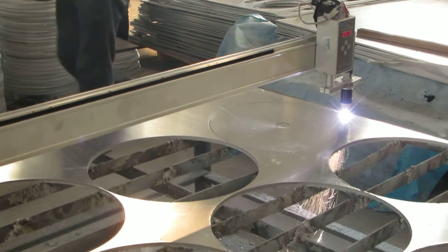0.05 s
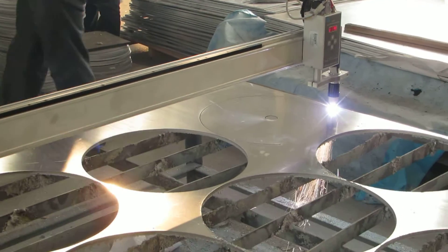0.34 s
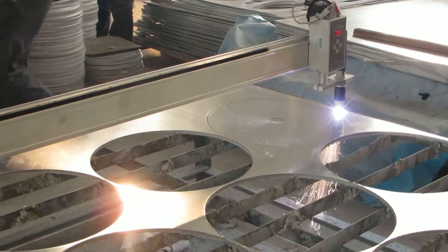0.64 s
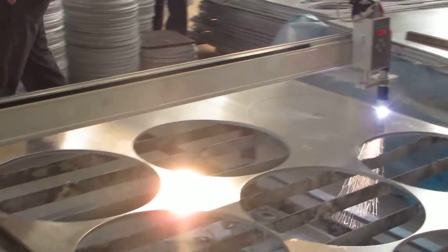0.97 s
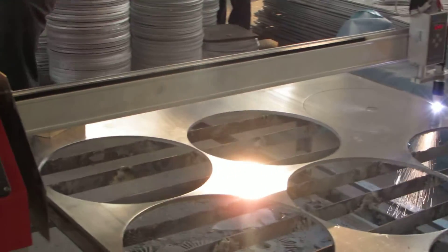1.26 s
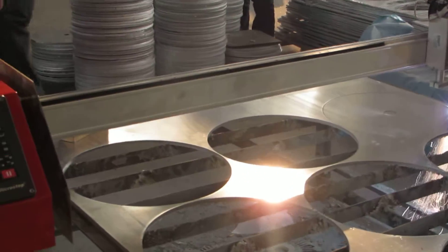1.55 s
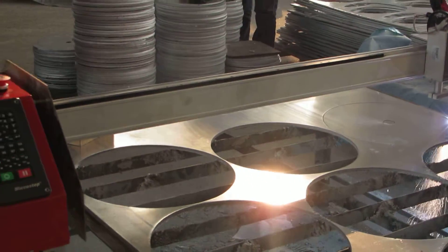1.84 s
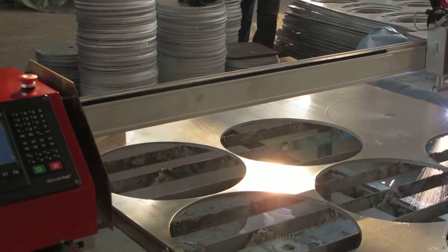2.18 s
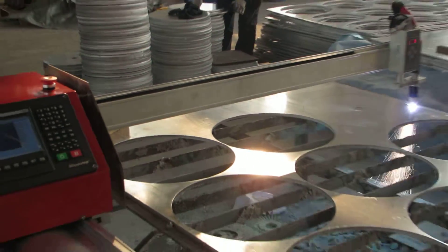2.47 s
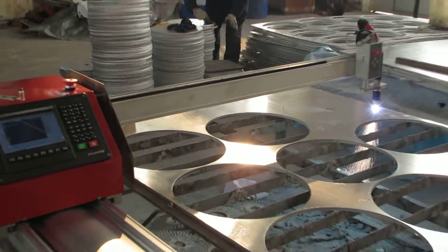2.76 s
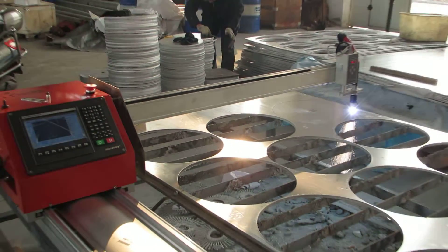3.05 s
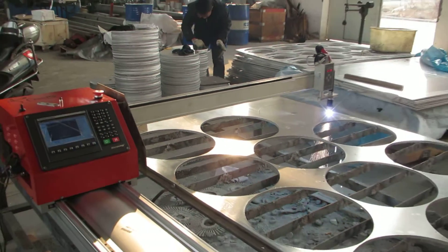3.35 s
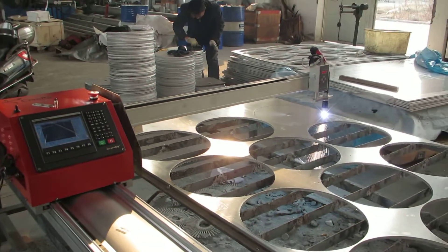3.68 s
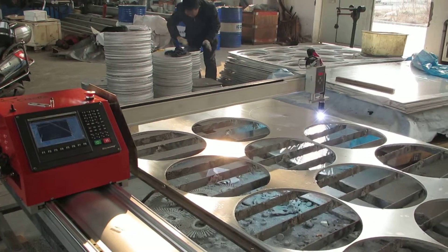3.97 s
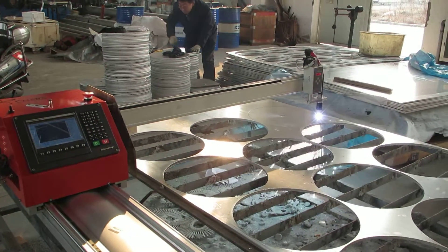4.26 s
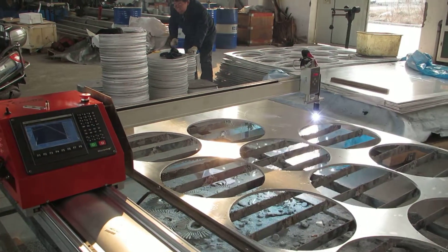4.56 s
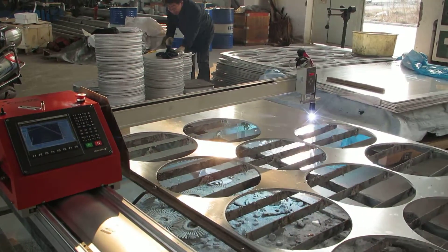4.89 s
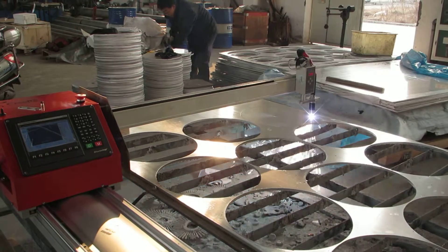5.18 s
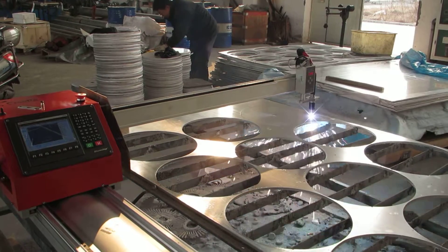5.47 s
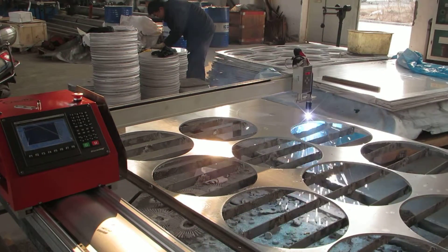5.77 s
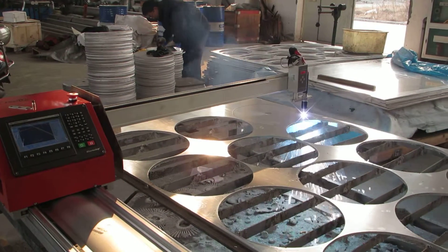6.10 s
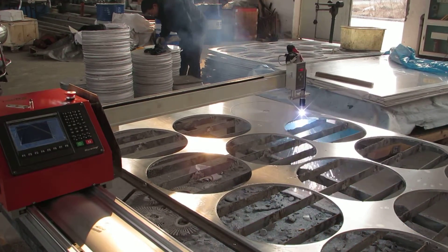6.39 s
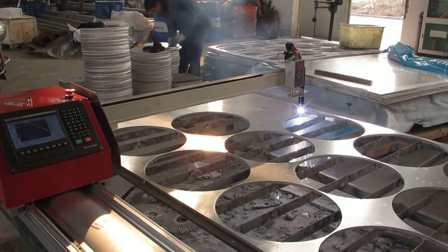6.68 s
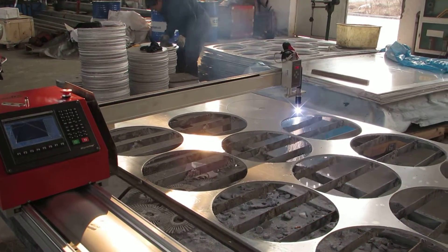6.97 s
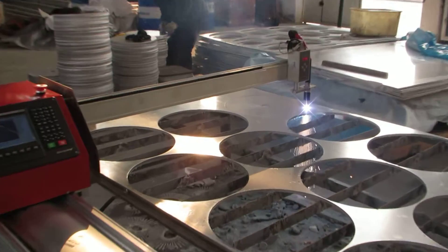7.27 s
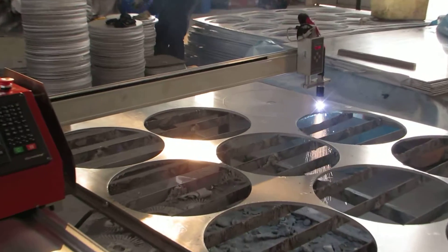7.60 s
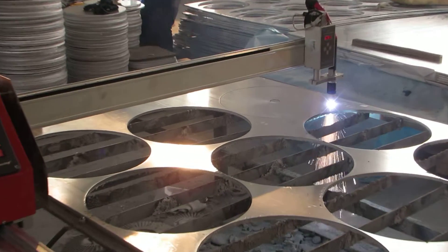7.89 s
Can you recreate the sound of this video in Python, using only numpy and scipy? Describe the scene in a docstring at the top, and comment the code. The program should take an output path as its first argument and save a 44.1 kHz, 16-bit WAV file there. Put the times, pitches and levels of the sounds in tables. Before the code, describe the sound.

A plasma torch cuts a metal plate in a workshop with a loud, continuous hiss. Fine sparks crackle within it, faint whistling tones shift in pitch, and a hollow roar comes from under the plate. Around the middle the roar swells, then the jet sputters brightly as it crosses a table slat and settles back into an even hiss. The sound is fairly close, with short reflections.

```python
"""Workshop: a plasma torch cuts discs out of a metal plate on a slatted table.
The turbulent jet roars in the hollow under the plate, hisses on top and sings faintly in the cut.
The roar swells, then the jet meets a slat and sputters brightly.
Molten droplets burst as crackling sparks throughout."""
import sys
import numpy as np
from scipy import signal
from scipy.io import wavfile

SR = 44100
rng = np.random.default_rng(int(sys.argv[2]) if len(sys.argv) > 2 else 0)


def put_to_file(sound):
    """Save the sound as 16-bit audio at rate SR, in the file named by the first command-line argument."""
    columns = np.atleast_2d(sound).T  # one column per channel
    safe = np.clip(columns, -1, 1)
    whole_steps = np.round(safe * 32767)
    wavfile.write(sys.argv[1], SR, whole_steps.astype(np.int16))


N = 350154
TIME_S = np.arange(N) / SR
SLAT_FROM_S, SLAT_TO_S = 5.55, 5.8   # jet crosses the slat


def from_db(db):
    """Decibels to gain."""
    return 10 ** (np.asarray(db) / 20)


def unit_rms(x):
    """Scale to rms 1."""
    return x / np.sqrt(np.mean(x ** 2) + 1e-20)


def in_time(curve):
    """Curve value at every sample."""
    return np.interp(TIME_S, *np.transpose(curve))


def at_hz(curve, hz):
    """Curve value on a log-frequency axis."""
    knots_hz, values = np.transpose(curve)
    return np.interp(np.log(hz), np.log(knots_hz), values)


def arch(start_s, end_s):
    """Rise from 0 to 1 and back between two times."""
    progress = np.clip((TIME_S - start_s) / (end_s - start_s), 0, 1)
    return np.sqrt(np.sin(np.pi * progress))


def surges(rows):
    """One curve of summed arches per gain column."""
    return sum(np.outer(gains_db, arch(start_s, end_s)) for start_s, end_s, *gains_db in rows)


def drift(rate_hz):
    """Slow random motion; rms 1."""
    step, settle = 40, 4000
    pole = np.exp(-2 * np.pi * rate_hz * step / SR)
    white = rng.standard_normal(N // step + settle + 2)
    slow = signal.lfilter([1], [1, -2 * pole, pole * pole], white)[settle:]
    return np.interp(np.arange(N) / step, np.arange(len(slow)), unit_rms(slow))


def resonate(x, hz, width_hz):
    """Two-pole resonance; peak gain 1."""
    r = np.exp(-np.pi * width_hz / SR)
    feedback = [1, -2 * r * np.cos(2 * np.pi * hz / SR), r * r]
    return signal.lfilter(np.array([1, 0, -1]) * (1 - r * r) / 2, feedback, x)


def spread(pair, hz):
    """Two independent noises to left and right, less alike in the treble."""
    # stereo likeness: (frequency [Hz], left-right correlation [1])
    likeness = [(30, 0.8), (130, 0.92), (700, 0.97), (1400, 0.97), (2800, 0.92), (5500, 0.89), (9000, 0.75),
                (13000, 0.47)]
    # stereo balance: (frequency [Hz], left minus right [dB])
    balance = [(30, -5), (80, -2.5), (180, -1.3), (600, -2), (1400, -0.5), (2800, -2), (5500, -0.7),
               (9500, 0.3), (13000, 1)]
    alike, sides = at_hz(likeness, hz), np.array([[1], [-1]])
    stereo = np.sqrt(1 + alike) * pair[0] + np.sqrt(1 - alike) * pair[1] * sides
    return stereo * from_db(sides * at_hz(balance, hz) / 2)


def turbulence(spectrum, flicker_db, flicker_hz):
    """Eddies: stereo noise bands, each flickering on its own; rms 1."""
    out, white = 0, rng.standard_normal((2, 2, N + SR // 4))
    edges_hz = np.concatenate([np.geomspace(20, 2560, 17)[:-1], np.geomspace(2560, 17000, 14)])
    for k, (low_hz, high_hz) in enumerate(zip(edges_hz, edges_hz[1:])):
        if high_hz > spectrum[0][0] and low_hz < spectrum[-1][0]:
            hz = np.sqrt(low_hz * high_hz)
            bandpass = signal.butter(3, [low_hz, high_hz], "band", fs=SR, output="sos")
            band = signal.sosfilt(bandpass, white[k % 2])[:, -N:]
            level_db = at_hz(spectrum, hz) + flicker_db * drift(flicker_hz)
            out = out + spread(band, hz) * from_db(level_db)
    return unit_rms(out)


def ring(flow, modes, waver_db=1.3):
    """A flow plus the resonances it rings, each unsteady; rms 1."""
    ringing = sum(from_db(db + waver_db * drift(2.5)) * resonate(flow, hz, width_hz)
                  for hz, width_hz, db in modes)
    return unit_rms(flow + ringing)


def reflections(x, gain, nearest_s, farthest_s, sway_s, count):
    """Echoes off plate, gantry and stacks; shifting paths make the colour wander."""
    out = x.copy()
    delays_s = np.geomspace(nearest_s, farthest_s, count) * rng.uniform(.9, 1.1, count)
    for k, delay_s in enumerate(delays_s):
        sent_s = TIME_S - delay_s - sway_s * drift(.16)
        echo = np.array([np.interp(sent_s, TIME_S, side, left=0) for side in x])
        out += (-1) ** k * gain * echo
    return out / np.sqrt(1 + count * gain ** 2)


def slat_notches(x):
    """Echoes off the slats cancel parts of the noise as the torch moves."""
    # cancelled bands: (start [s], end [s], centre [Hz], width [Hz], peak share cancelled [1])
    notches = [(-.5, 2, 2100, 700, .25), (.4, 1.5, 6120, 250, 0.35), (.4, 1.5, 6800, 200, 0.32),
               (2.4, 3.4, 3800, 250, .25), (3, 4.1, 1860, 200, .3), (4.1, 5, 5420, 180, .3),
               (5.3, 6.4, 4060, 150, .33), (5.3, 6.45, 4980, 290, .64), (5.5, 6.4, 3000, 250, 0.38),
               (5.3, 7.3, 6350, 200, .33), (5.3, 6.7, 7630, 200, .35), (6.4, 8.6, 4846, 600, .2)]
    return x - sum(share * arch(start_s, end_s) * resonate(x, hz, width_hz)
                   for start_s, end_s, hz, width_hz, share in notches)


def table_modes():
    """Past the slat, the jet enters another bay and rings the table in new proportions."""
    # plate, slat and frame modes: (centre [Hz], width [Hz], gain before slat [dB], gain after [dB])
    modes = [(745, 55, 0.5, 0.5), (875, 75, 2, 5), (1085, 38, -5, -10), (1350, 70, -2, -2.5),
             (1500, 36, -10, 0), (1556, 48, -4, -11), (1773, 31, -12, 0.5), (2155, 130, -4.5, -6),
             (2450, 35, 0.5, -4), (2783, 50, 0, -2)]
    crossed = np.clip((TIME_S - SLAT_FROM_S) / (SLAT_TO_S - SLAT_FROM_S), 0, 1)
    return [(hz, width_hz, before_db + crossed * (after_db - before_db))
            for hz, width_hz, before_db, after_db in modes]


def sparks(per_s, size_range_db, hz, width_hz):
    """Molten droplets burst as tiny ticks of uneven size; rms 1."""
    sizes = from_db(size_range_db * rng.random(N)) * rng.choice([-1, 1], N)
    ticks = sizes * (rng.random(N) < per_s / SR)
    decay_s = .0004
    bursts = signal.lfilter([1], [1, -np.exp(-1 / (decay_s * SR))], ticks + 1e-18)
    noise = spread(rng.standard_normal((2, N)), hz)
    return unit_rms(resonate(bursts * noise, hz, width_hz))


def faint_bands(per_s=4, length_s=.7, low_hz=6000, high_hz=10300, width_hz=195, level_db=-16.5):
    """Weak bands at random times and pitches, as rows for singing()."""
    chance = rng.random((64, 2))
    starts_s = (np.arange(len(chance)) + chance[:, 0]) / per_s - length_s
    pitches_hz = low_hz * (high_hz / low_hz) ** chance[:, 1]
    return [(start_s, start_s + length_s, hz, 0, width_hz, level_db)
            for start_s, hz in zip(starts_s, pitches_hz) if start_s < TIME_S[-1]]


def singing(wander_share=.007, waver_db=1.25, fade_s=.12):
    """The cut reinforces narrow bands of the jet while its shape suits them."""
    # jet bands: (start [s], end [s], mid pitch [Hz], glide [Hz/s], width [Hz], relative level [dB])
    bands = [(-.3, 1.25, 1325, -2, 200, -15.5), (-.3, .72, 3260, 0, 230, -13),
             (-.2, .85, 4560, 0, 220, -14), (-.2, .3, 5700, 0, 200, -13), (.1, .85, 7970, 99.5, 240, -6.5),
             (.35, 1.15, 6460, -60, 200, -10.5), (.8, 1.4, 3360, 0, 120, -15),
             (.78, 1.15, 4300, -250, 170, -13.5), (.85, 1.25, 5780, -100, 160, -12.5),
             (.9, 1.9, 4030, -1, 170, -16.5), (1.05, 2.15, 1400, 110.5, 140, -15),
             (1.2, 2.7, 5200, 0, 597, -13), (1.2, 1.8, 7590, 1, 180, -14), (1.25, 2, 10140, 100, 250, -10),
             (1.25, 2, 11630, 0, 250, -13.5), (1.6, 2.7, 11080, 200, 480, -10.5),
             (1.95, 3.62, 3350, 0, 190, -13.5), (2.45, 3.6, 2810, 0, 110, -17),
             (2.35, 2.85, 7900, 0, 220, -9), (2.8, 3.5, 7930, -300, 301, -12),
             (3.1, 3.7, 8800, 2, 160, -15), (3.25, 4, 10850, 200, 500, -14), (3.5, 5, 5880, 100, 350, -13),
             (3.6, 4.75, 7370, 0, 140, -13.5), (4.05, 5.1, 6010, -40, 110, -14),
             (4.3, 4.9, 4010, -1.5, 130, -16), (4.8, 5.44, 4050, -1, 130, -13.2),
             (4.85, 5.3, 900, 0, 180, -15), (5.44, 6.02, 3410, 0, 300, -15.5),
             (5.48, 6.1, 3800, 0, 220, -20), (5.44, 6, 4590, 0, 280, -11),
             (5.39, 6.16, 5510, 0.5, 420, -6.7), (5.7, 5.93, 6080, 0, 170, -5.5),
             (5.48, 6.08, 7150, 198, 450, -7.5), (5.45, 6, 8190, 0, 200, -11.5),
             (5.7, 6.15, 10850, -2, 300, -12.5), (5.85, 6.44, 8500, -1200, 650, -5.5),
             (6.03, 6.2, 6460, 0, 300, -7), (6.2, 6.7, 6720, -2, 130, -8), (6.22, 6.45, 8020, 2, 130, -8),
             (6.1, 6.7, 4235, 0, 200.4, -17.5), (6.2, 8.3, 2000, 0, 298.4, -20),
             (6.7, 8.3, 3520, 0, 560, -12.5), (6.8, 8.3, 2950, 0, 400, -19),
             (6.8, 7.6, 8450, 152, 550, -10), (6.45, 7.25, 5430, 0, 120, -13.5),
             (6.8, 7.45, 6740, -0.5, 150, -12), (7.05, 8.3, 7850, -30, 200, -7)]
    out = np.zeros((2, N))
    eddies = rng.standard_normal((2, N)) + 1j * rng.standard_normal((2, N))
    wander, waver = drift(3), drift(6)
    for start_s, end_s, hz, glide_hz_per_s, width_hz, db in bands + faint_bands():
        live = np.flatnonzero((TIME_S > start_s) & (TIME_S < end_s))
        own = (live + rng.integers(N)) % N   # each band gets its own stretch of noise
        if len(live):
            time_s, middle_s = TIME_S[live], (start_s + end_s) / 2
            # eddies shake the tone's amplitude and phase
            shake = signal.sosfilt(signal.butter(2, width_hz / 2, fs=SR, output="sos"), eddies[:, own])
            pitch_hz = hz * (1 + wander_share * wander[own]) + glide_hz_per_s * (time_s - middle_s)
            carrier = np.exp(2j * np.pi * np.cumsum(pitch_hz) / SR)
            tone = (shake * carrier).real * from_db(waver_db * waver[own])
            envelope = np.sqrt(np.clip(np.minimum(time_s - start_s, end_s - time_s) / fade_s, 0, 1))
            out[:, live] += from_db(db) * envelope * unit_rms(spread(tone, hz))
    return out


def jet_under_plate():
    """Flow through the cut drives rumble, roar and rush; blasts into a hollow lift the lower two."""
    # exhaust in the table: (frequency [Hz], relative density [dB])
    rumble_spectrum = [(25, -24), (40, -15), (62, -5.5), (90, -7.5), (130, 0), (200, -1.5), (300, -2.5),
                       (450, 1.5), (560, -12.5), (800, -13.5)]
    # jet leaving the underside: (frequency [Hz], relative density [dB])
    roar_spectrum = [(330, -21), (450, -6.5), (560, -0.5), (720, 1), (900, -2), (1050, -1), (1250, -11.5),
                     (2000, -34)]
    # gas in the cut: (frequency [Hz], relative density [dB])
    rush_spectrum = [(600, -24), (1050, -5), (1450, 1.5), (1850, -3), (2400, -1), (2900, -2.5), (3600, -3),
                     (5000, -14)]
    # air resonances under the plate: (centre [Hz], width [Hz], gain [dB])
    hollow_modes = [(129, 54, -9), (199, 18, 2.5), (270, 11, -0.5)]
    # flow through the plate: (time [s], relative level [dB])
    flow = [(0.0, -30), (0.09, -28.5), (1.15, -30), (1.39, -28), (3.63, -29), (5.0, -28), (5.22, -27.5),
            (5.35, -30.5), (5.53, -29), (5.66, -31), (6.08, -35), (7.08, -29.5), (7.41, -32), (7.94, -30.5)]
    # blasts into a hollow: (start [s], end [s], rumble gain [dB], roar gain [dB])
    blasts = [(3.9, 4.48, 5.5, 4), (4.38, 5.0, 3.5, 4), (4.92, 5.3, 7, 5.5), (5.22, 5.66, 5.5, 3)]
    flow_db = in_time(flow)
    swing_db = flow_db - flow_db.mean()
    rumble_blast_db, roar_blast_db = surges(blasts)
    pass_db = 2.5 * arch(.88, 7.2)   # torch passes over a hollow
    rumble_db = -40.5 + .49 * swing_db + pass_db + rumble_blast_db
    roar_db = -34.5 + swing_db + roar_blast_db
    rush_db = -29.5 + 1.54 * swing_db
    rumble = ring(turbulence(rumble_spectrum, flicker_db=1.1, flicker_hz=4.1), hollow_modes)
    roar = ring(turbulence(roar_spectrum, flicker_db=.9, flicker_hz=4.2), table_modes())
    rush = ring(turbulence(rush_spectrum, flicker_db=1.07, flicker_hz=11), table_modes())
    exhaust = from_db(rumble_db) * rumble + from_db(roar_db) * roar + from_db(rush_db) * rush
    return reflections(slat_notches(exhaust), gain=.11, nearest_s=.012, farthest_s=.05,
                       sway_s=.0001, count=10)


def jet_above_plate():
    """Jet force drives hiss, sizzle, sparks and singing; the arc flutters, most at the slat."""
    # jet striking the plate: (frequency [Hz], relative density [dB])
    hiss_spectrum = [(1500, -16.5), (2600, -12), (3300, -3), (4100, -1.5), (4900, -1.5), (6000, 0.5),
                     (7900, 1.6), (9300, -5.5), (12000, -10.5), (15000, -26)]
    # finest eddies at the nozzle: (frequency [Hz], relative density [dB])
    sizzle_spectrum = [(6000, -12.5), (8000, -1), (9300, 2), (11000, -1.5), (12500, -11), (14000, -14.5),
                       (16000, -34)]
    # resonance of the gap under the nozzle: (centre [Hz], width [Hz], gain [dB])
    gap_modes = [(5730, 120, -13)]
    # jet force on the plate: (time [s], level [dB])
    force = [(0, -18), (.35, -18), (.48, -17.5), (.65, -18), (1.6, -18), (2.8, -19), (3.75, -18.5),
             (4.28, -20), (4.47, -17.5), (4.92, -18.5), (5.38, -22), (5.72, -20), (6.05, -19.5),
             (6.3, -18.8), (6.58, -21.5), (6.75, -19.8), (7.04, -19.3), (7.12, -18), (7.32, -17.7),
             (7.39, -20), (7.52, -20), (7.6, -19), (7.94, -18)]
    # extra top treble: (time [s], sizzle gain [dB])
    brightness = [(0, -3.5), (2, -1), (3.7, 1), (4.1, -2.5), (4.62, -0.5), (4.85, -9), (5.4, -3), (5.7, -2),
                  (5.95, -.5), (6.3, -3), (7.94, 0.5)]
    # spurts back off the slat: (start [s], end [s], drive gain [dB], sizzle gain [dB])
    spurts = [(5.458, 5.597, 4, 2.3), (5.6, 5.662, 4.5, 2), (5.755, 5.885, 1.4, 7.5), (5.87, 5.96, 1.3, 5),
              (5.88, 6.14, 0.5, 7.7)]
    force_db = in_time(force)
    drive_spurt_db, sizzle_spurt_db = surges(spurts)
    drive_db = force_db + drive_spurt_db
    sizzle_db = -22.5 + 1.6 * (force_db - force_db.mean()) + in_time(brightness) + sizzle_spurt_db
    impact = turbulence(hiss_spectrum, flicker_db=1, flicker_hz=9.1)
    hiss = from_db(drive_db - .28) * ring(impact, gap_modes)
    sizzle = from_db(sizzle_db) * turbulence(sizzle_spectrum, flicker_db=1, flicker_hz=12)
    crackle = from_db(drive_db - 23.5) * sparks(per_s=120, size_range_db=2, hz=6500, width_hz=3600)
    spray = reflections(hiss + sizzle + crackle, gain=.14, nearest_s=.003, farthest_s=.022,
                        sway_s=.00005, count=12)
    flutter_db = (.41 + .2 * arch(SLAT_FROM_S, SLAT_TO_S)) * drift(28)
    return from_db(flutter_db) * (slat_notches(spray) + from_db(drive_db) * singing())


def scene():
    """Roar under the plate plus hiss above it."""
    return jet_under_plate() + jet_above_plate()


def record(dry, right_highpass_hz=111, rolloff_hz=13500, cutoff_hz=15550):
    """The right microphone has thinner bass; both dull the top, then cut off steeply."""
    right = signal.sosfilt(signal.butter(1, right_highpass_hz, "high", fs=SR, output="sos"), dry[1])
    dulled = signal.sosfilt(signal.butter(2, rolloff_hz, fs=SR, output="sos"), [dry[0], right])
    return signal.sosfilt(signal.ellip(12, .1, 90, cutoff_hz, fs=SR, output="sos"), dulled)


dry = scene()
out = record(dry)
put_to_file(out)
```